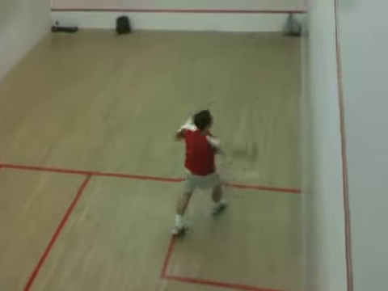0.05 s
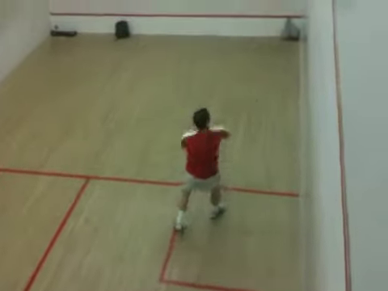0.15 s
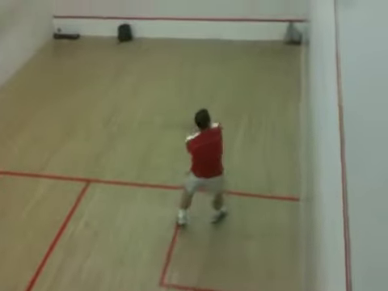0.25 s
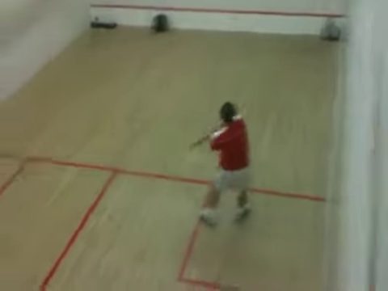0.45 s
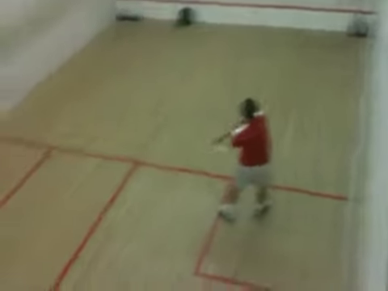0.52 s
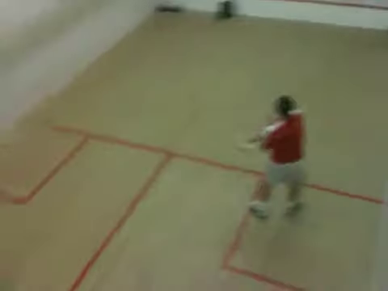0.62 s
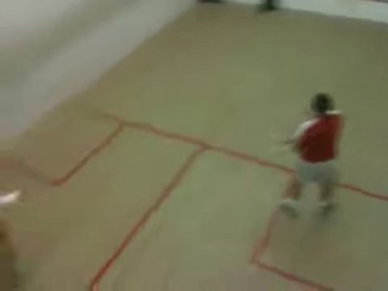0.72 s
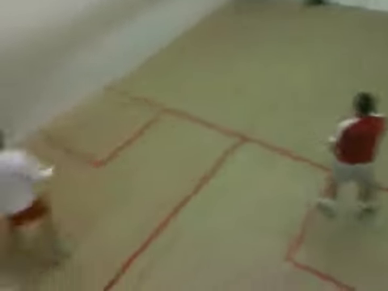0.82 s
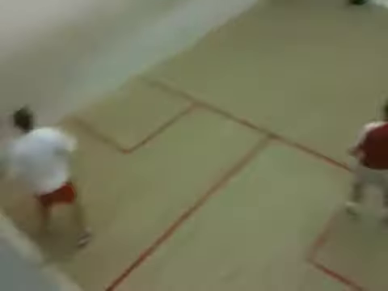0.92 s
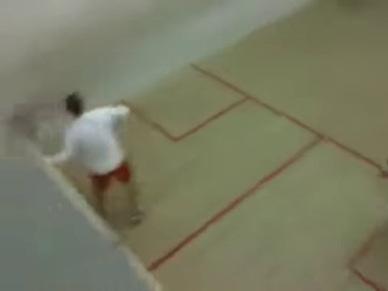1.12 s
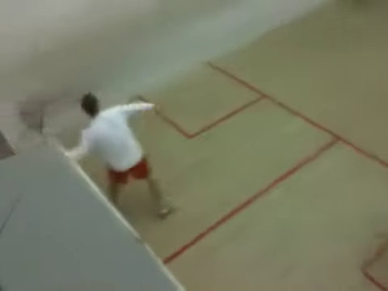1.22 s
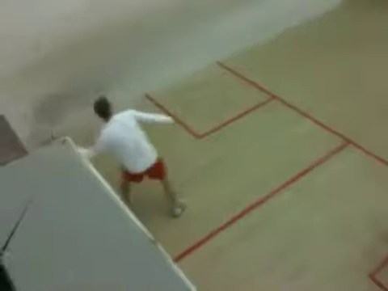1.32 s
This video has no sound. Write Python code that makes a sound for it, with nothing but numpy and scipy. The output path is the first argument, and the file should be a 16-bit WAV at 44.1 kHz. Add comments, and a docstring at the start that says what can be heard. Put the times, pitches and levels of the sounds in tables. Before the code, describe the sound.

A racket hits a squash ball, which cracks against the wall of an echoing court.

```python
"""A squash ball, struck once by a swishing racket, cracks against the front wall of the court.
The first impact excites damped modes of the string bed; the second is a broadband impulse with a thump.
Repeated reflection between the hard walls sustains both as reverberation for over a second.
Shoes thud and scuff on the wooden floor, above the steady rush and hum of the ventilation."""
import sys
import numpy as np
from scipy import signal
from scipy.fft import rfft, irfft, next_fast_len
from scipy.io import wavfile

SR = 44100
rng = np.random.default_rng(int(sys.argv[2]) if len(sys.argv) > 2 else 0)


def digitize_waveform(pressure):
    """Quantize a signal to 16-bit integers and store it at the path in sys.argv[1].

    Rows of a 2-D input are taken as channels; values are limited to [-1, 1].
    """
    field = np.atleast_2d(pressure).T
    bounded = np.clip(field, -1, 1)
    quanta = np.round(bounded * 32767).astype(np.int16)
    wavfile.write(sys.argv[1], SR, quanta)


N = 59535
T = np.arange(N) / SR
RACKET_S, WALL_S = .229, .41   # instants of impact

# spectrum of the ventilation's rush: f/Hz, level/dB
AIR_SPECTRUM = [(25, -43), (65, -59), (115, -35), (200, -37.5), (400, -40), (650, -52.5), (1150, -46.5),
                (2000, -59.5), (4000, -70), (9000, -70.5), (15000, -77)]
# partials of its hum: f/Hz, rms level/dB
HUM_PARTIALS = [(122, -56), (200, -62.5)]
# footfalls: t/s, thud level/dB, slap level/dB
FOOTFALLS = [(0.054, -16, -26), (0.61, 5.5, -7), (.768, 1.5, -34), (.888, -7.5, -17.5), (.961, -7, -14),
             (1.129, -4, -10), (1.257, -11, -19.5), (1.334, -19, -24)]
# spectrum of the boards' thud: f/Hz, level/dB
THUD_SPECTRUM = [(60, -41), (130, -8.5), (220, -3), (400, 3.5), (700, -10.5), (2000, -29), (8000, -79)]
# spectrum of a sole's slap: f/Hz, level/dB
SLAP_SPECTRUM = [(150, -23), (700, -2), (2000, -2.5), (4000, -15.5), (8000, -21.5), (15000, -36)]
# sliding soles: peak t/s, rise t/s, fall t/s, level/dB
SLIDES = [(1.127, 0.089, 0.045, -54), (1.28, 0.059, 0.094, -60.5)]
# spectrum of sole friction: f/Hz, level/dB
SCUFF_SPECTRUM = [(150, 8), (1200, 9), (2500, 2), (5500, 1.5), (9000, -8), (15000, -18)]
# early reflections of the shoes: delay t/s, level/dB
STEP_REFLECTIONS = [(.003, -1), (.01, -5)]
# diffuse field of the court: f/Hz, level/dB, t60/s
REVERBERATION = [(117, 10, 1.5), (332, 12, 1.16), (850, 9.5, 1.5), (1670, 11, 1.48), (4100, 8.5, 1.39),
                 (7280, 6, 1.1), (14400, 4.5, 0.36)]
# spectrum of air passing the strings: f/Hz, level/dB
SWISH_SPECTRUM = [(100, 12), (400, 15), (1500, 1), (4000, -4), (8000, -3), (15000, -28)]
# modes of string bed and ball: f/Hz, level/dB, t60/s
BED_MODES = [(213, -30, 0.021), (361, -23, 0.011), (460, -57, .05), (809, -27.5, 0.023),
             (1086, -28.5, 0.023), (1190, -29, 0.022), (1538.5, -39, 0.1), (1680, -61, 0.033),
             (2362, -29, 0.023)]
# high modes of single strings: f/Hz, level/dB, t60/s
PING_MODES = [(5010, -39, 0.022), (6380, -29.5, .018), (7700, -27, 0.016)]
# spectrum of the strings' tick on the ball: f/Hz, level/dB
TICK_SPECTRUM = [(100, -41), (1800, -18), (3300, -5.5), (6000, -5.5), (7600, -4.5), (8600, -12.5),
                 (11000, -18.5), (15000, -30)]
# early reflections of the stroke: delay t/s, level/dB
RACKET_REFLECTIONS = [(.006, -2), (.0085, -3), (0.0293, -3.5)]
# spectrum of the first instant at the wall, heard directly: f/Hz, level/dB
CRACK_SPECTRUM = [(300, -44), (1500, 2), (2500, 9), (4000, 4), (7000, 3), (10000, -2.5), (15000, -29)]
# spectrum of the ball's smack on the wall: f/Hz, level/dB
SMACK_SPECTRUM = [(60, -23), (130, 0.5), (200, 10.5), (310, 16.5), (450, 16), (600, 6.5), (690, 12.5),
                  (850, 15.5), (1040, 3.5), (1350, 13), (1780, 10.5), (2150, 7.5), (3000, 1.5), (5500, 2.5),
                  (8500, -2), (11000, -7), (15000, -17)]
# early reflections of the smack: delay t/s, level/dB
WALL_REFLECTIONS = [(.0069, -10.5), (.0078, -8), (0.014, -18), (0.0153, -11), (0.0165, -6.5),
                    (0.0231, -9.5), (.0255, -5.5), (0.043, -8), (0.0585, -6.5), (0.064, -8.5), (.076, -8.5)]


def from_db(db):
    """Amplitude ratio of a level: tenfold for every 20 dB."""
    return 10 ** (np.asarray(db) / 20)


def at_hz(points, hz, column=1):
    """Interpolation of a table column along log frequency."""
    table = np.array(points)
    return np.interp(np.log(np.maximum(hz, 1)), np.log(table[:, 0]), table[:, column])


def colour(x, spectrum):
    """Minimum-phase filtering: folding the cepstrum gives the spectrum a causal response."""
    size = next_fast_len(2 * N)
    size += size % 2
    gain = from_db(at_hz(spectrum, np.arange(size // 2 + 1) * SR / size))
    cepstrum = irfft(np.log(gain))
    cepstrum[1:size // 2] *= 2
    cepstrum[size // 2 + 1:] = 0
    return irfft(rfft(x, size) * np.exp(rfft(cepstrum)))[:N]


def cut(x, hz, kind):
    """Second-order Butterworth filtering, low-pass or high-pass."""
    return signal.sosfilt(signal.butter(2, hz, kind, fs=SR, output="sos"), x)


def clicks(rows):
    """Ideal impulses, one for each row of t/s, level/dB."""
    out = np.zeros(N)
    for s, db in rows:
        out[int(s * SR)] += from_db(db)
    return out


def burst(start_s, fade_s):
    """Exponentially decaying noise with the energy of a unit impulse."""
    x = rng.standard_normal(N) * (T >= start_s) * np.exp(-np.maximum(T - start_s, 0) / fade_s)
    return x / np.linalg.norm(x)


def ring(x, hz, t60):
    """Damped harmonic oscillator: a unit impulse starts a sinusoid of unit amplitude."""
    r, w = from_db(-60 / (t60 * SR)), 2 * np.pi * hz / SR
    return signal.lfilter([1, -r * np.cos(w)], [1, -2 * r * np.cos(w), r * r], x + 1e-18)


def ventilation():
    """Broadband flow noise, with a hum that wavers by slow random amplitude modulation."""
    hum = 0
    for hz, db in HUM_PARTIALS:
        waver = 1 + .22 * signal.resample(rng.standard_normal(16), N)
        hum += from_db(db) * np.sqrt(2) * waver * np.sin(2 * np.pi * (hz * T + rng.random()))
    return hum + colour(rng.standard_normal(N), AIR_SPECTRUM)


def shoes():
    """Impact makes the boards thud and the soles slap; sliding friction adds scuffs of noise."""
    thuds = colour(clicks([(s, db) for s, db, _ in FOOTFALLS]), THUD_SPECTRUM)
    slaps = colour(clicks([(s, db) for s, _, db in FOOTFALLS]), SLAP_SPECTRUM)
    slide = sum(from_db(db) * np.exp(-np.maximum((s - T) / rise, (T - s) / fall))
                for s, rise, fall, db in SLIDES)
    scuffs = colour(slide * rng.standard_normal(N), SCUFF_SPECTRUM)
    return court(thuds + slaps + scuffs, STEP_REFLECTIONS,
                 dull_hz=2140, smear_db=-2, tail_db=-5.5, scatter_db=-7.5)


def diffuse_tail(build_up_s=.004):
    """Reverberation: each band of a diffuse field decays exponentially, the top treble fastest."""
    white, tail = rfft(rng.standard_normal(N)), 0
    octave = np.log2(np.maximum(np.arange(len(white)) * SR / N, 1))
    centres = np.geomspace(80, 16000, 16)
    for hz, pick in zip(centres, np.eye(len(centres))):
        band = irfft(white * np.interp(octave, np.log2(centres), pick), N)
        fade_s = at_hz(REVERBERATION, hz, column=2) / np.log(1000)
        decay = np.exp(-T / fade_s) * np.sqrt(2 / (fade_s * SR))   # unit energy
        tail += band * from_db(at_hz(REVERBERATION, hz)) * decay
    return cut(tail * (1 - np.exp(-T / build_up_s)), hz=103, kind="high")


def court(x, echoes, dull_hz, smear_db, tail_db, scatter_db):
    """Reflection: the direct sound is followed by early echoes, scattered ones and a diffuse tail."""
    # the walls spread the treble of each echo in time
    smear = sum(from_db(db + smear_db) * burst(s, fade_s=.001) for s, db in echoes)
    early = cut(clicks(echoes), dull_hz, "low") + smear
    echoes_per_s, peak_s = 900, .05
    arrivals = (rng.random(N) < echoes_per_s / SR) * rng.choice([-1, 1], N)
    scatter = arrivals * T * np.exp(-T / peak_s)
    scatter /= np.linalg.norm(scatter)
    response = early + from_db(scatter_db) * scatter + from_db(tail_db) * diffuse_tail()
    return x + signal.fftconvolve(x, response)[:N]


def swish(level_db=-47.5, rise_s=.026):
    """Flow noise of air through the strings grows with the speed of the swing, up to the contact."""
    speed = np.exp(np.minimum(T - RACKET_S, 0) / rise_s) * (T < RACKET_S)
    return from_db(level_db) * colour(speed * rng.standard_normal(N), SWISH_SPECTRUM)


def racket(give_s=.001417):
    """Modal excitation: the ball ticks on the strings, then squashes and sets the bed vibrating."""
    touch = clicks([(RACKET_S, 0)])
    push = cut(clicks([(RACKET_S + give_s, 0)]), hz=1475, kind="low")   # a soft ball pushes bluntly
    bed = sum(from_db(db) * ring(push, hz, t60) for hz, db, t60 in BED_MODES)
    bed = cut(bed, hz=132, kind="high")
    pock = from_db(-24) * ring(push, hz=311, t60=.059)   # the ball squashing
    side_wall_echo = clicks([(RACKET_S + RACKET_REFLECTIONS[0][0], -1.5)])
    pings = sum((-1) ** k * from_db(db) * ring(touch + side_wall_echo, hz, t60)
                for k, (hz, db, t60) in enumerate(PING_MODES))
    direct = pock + pings + from_db(-10.5) * bed   # the bed radiates extra sound straight backwards
    tick = colour(touch, TICK_SPECTRUM)
    return direct + court(bed + tick, RACKET_REFLECTIONS,
                          dull_hz=1960, smear_db=-5.5, tail_db=0, scatter_db=-1)


def front_wall(thump_lag_s=.0013):
    """Impulsive excitation: the ball cracks on the wall, thumps as it flattens and excites the room."""
    crack = colour(burst(WALL_S, fade_s=.0011), CRACK_SPECTRUM)
    smack = colour(clicks([(WALL_S, 0)]), SMACK_SPECTRUM)
    thump = ring(clicks([(WALL_S + thump_lag_s, -15.5)]), hz=293, t60=.059)
    thump = cut(cut(thump, hz=150, kind="high"), hz=860, kind="low")
    return crack + thump + court(smack, WALL_REFLECTIONS,
                                 dull_hz=8800, smear_db=-.5, tail_db=-.5, scatter_db=1.5)


def scene():
    """Linear superposition of all the sources, in mono."""
    return (ventilation() + shoes() + swish() + racket() + front_wall())[None]


def record(dry):
    """A small microphone limits the bandwidth; its group delay in one band smears clicks slightly."""
    delayed_hz, width_hz, cutoff_hz = 5560, 1400, 15900
    r, w = np.exp(-np.pi * width_hz / SR), 2 * np.pi * delayed_hz / SR
    poles = [1, -2 * r * np.cos(w), r * r]
    thinned = cut(dry, hz=61, kind="high")
    smeared = signal.lfilter(poles[::-1], poles, thinned)   # all-pass
    return signal.sosfilt(signal.ellip(10, .1, 70, cutoff_hz, fs=SR, output="sos"), smeared)


dry = scene()
out = record(dry)
digitize_waveform(out)
```